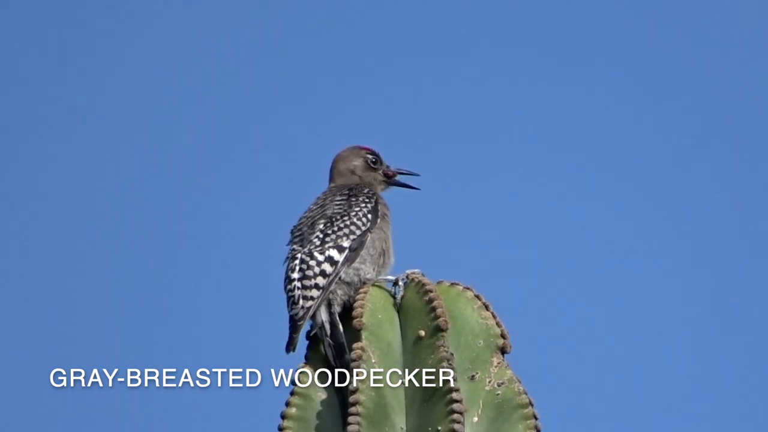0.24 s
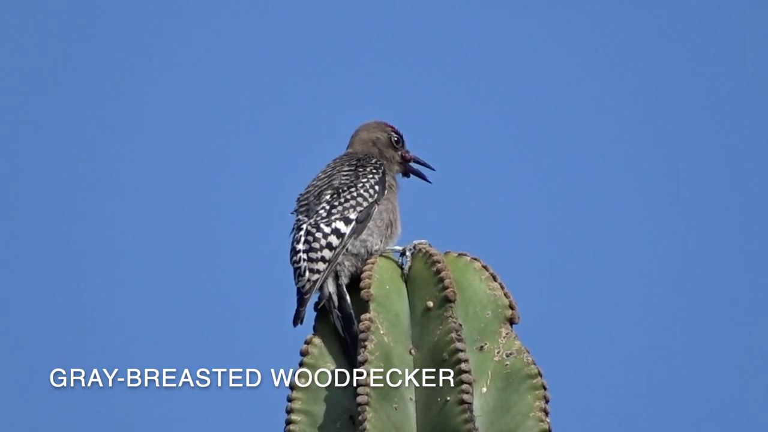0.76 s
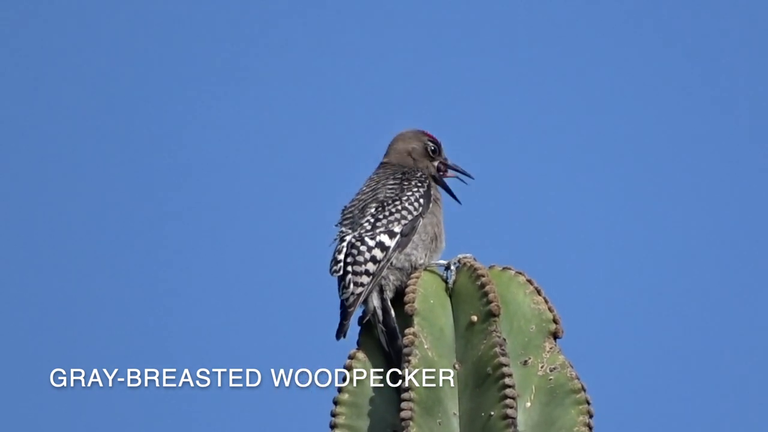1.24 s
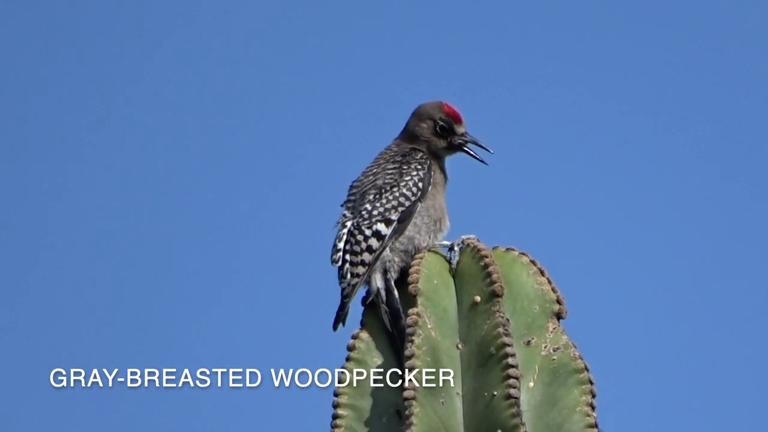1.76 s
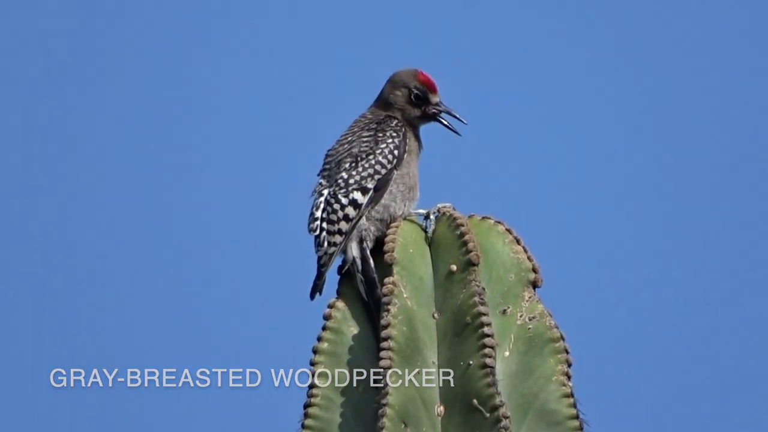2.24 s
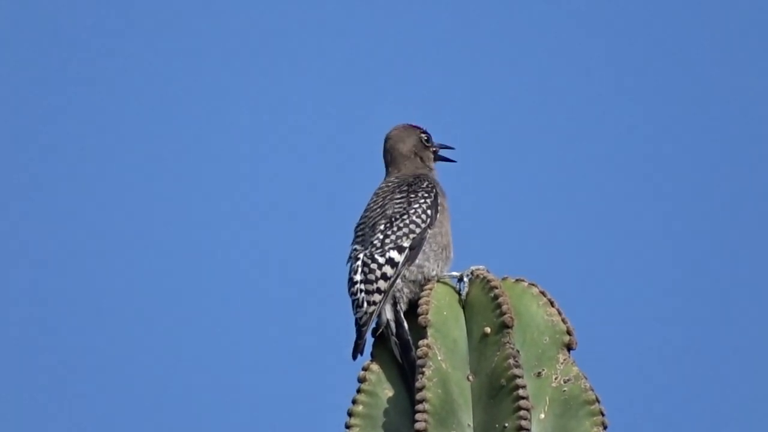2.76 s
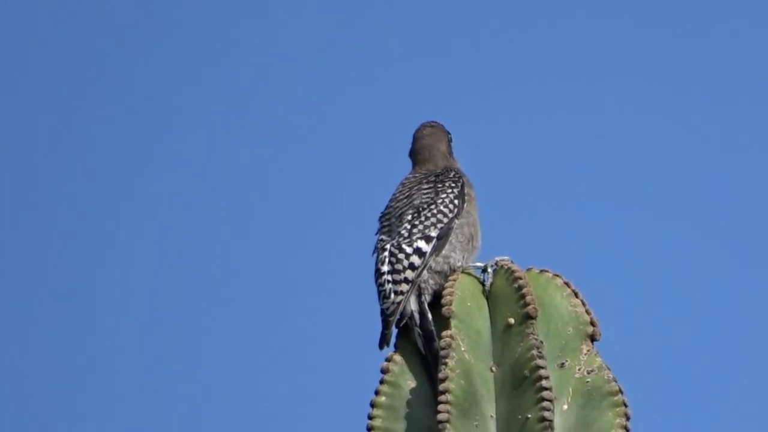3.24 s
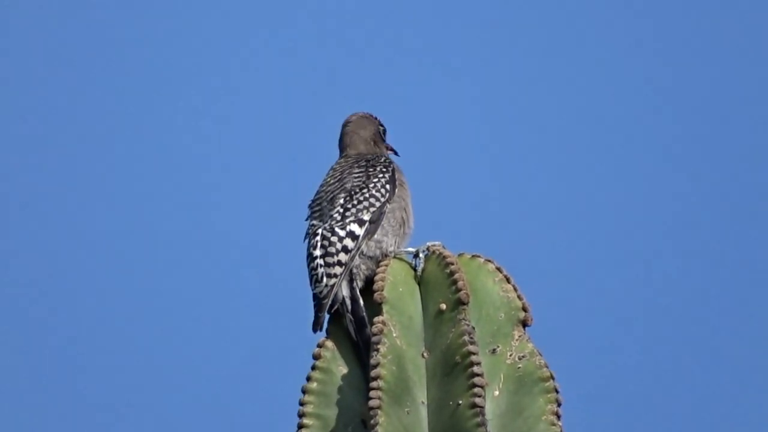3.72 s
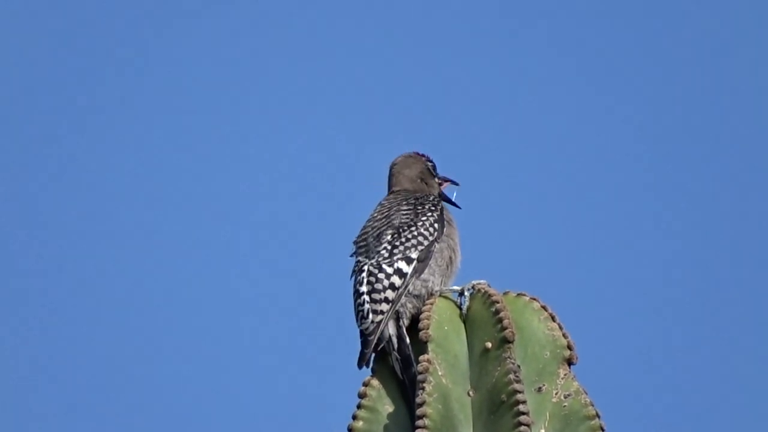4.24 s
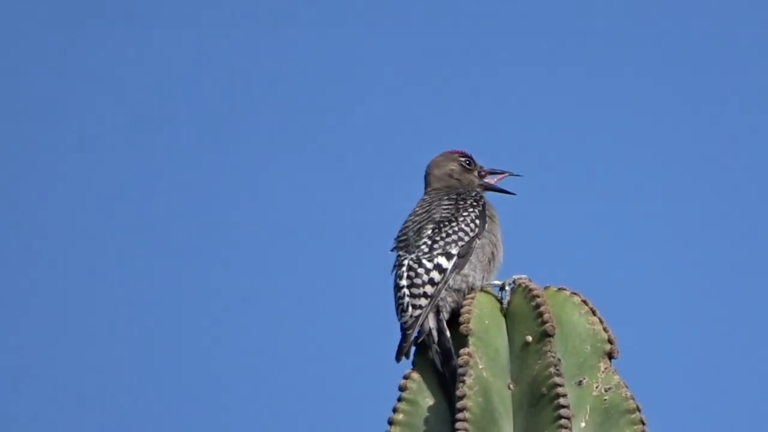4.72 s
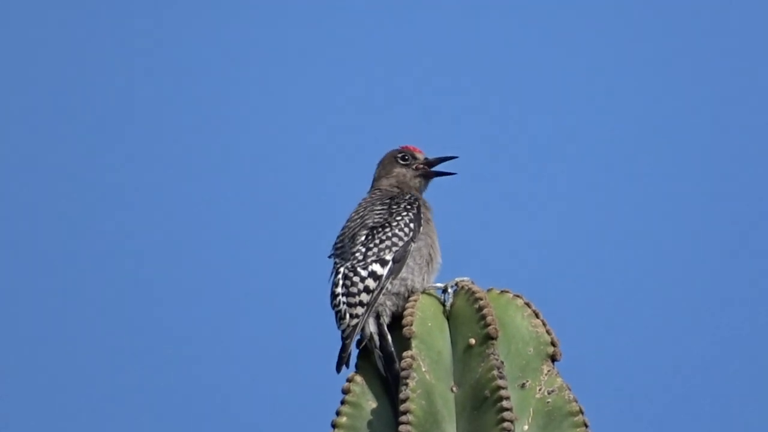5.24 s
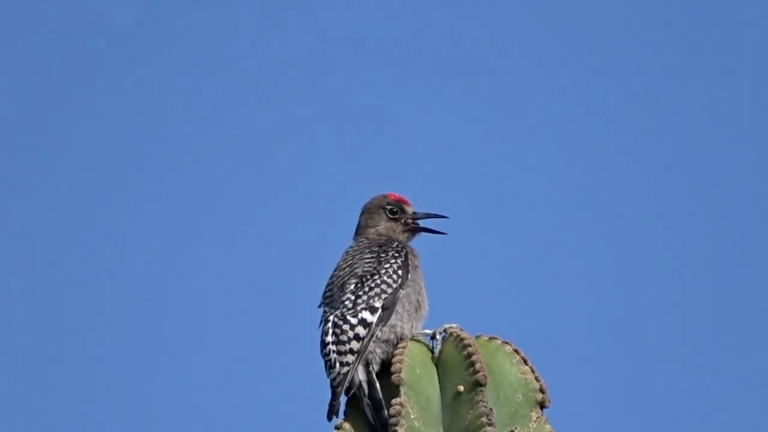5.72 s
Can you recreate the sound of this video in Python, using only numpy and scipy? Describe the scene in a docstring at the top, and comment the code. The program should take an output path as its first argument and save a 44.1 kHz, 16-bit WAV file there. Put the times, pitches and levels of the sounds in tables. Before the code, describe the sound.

A woodpecker gives short, sharp call notes in two runs, each note followed by a softer, lower one, over faint outdoor hiss.

```python
"""Woodpecker on a cactus

Seven sharp notes come in two runs, each trailed by a soft note about an octave lower. Every note is
a short arch of pitch whose overtones pass the throat; ground, scrub and a far slope throw it back.
Behind it lies a bed of low far rush and faint hum, with thin insects, small birds and a dry knock."""
import sys
import numpy as np
from scipy import signal
from scipy.fft import rfft, irfft
from scipy.io import wavfile
from scipy.ndimage import map_coordinates

SR = 44100
rng = np.random.default_rng(int(sys.argv[2]) if len(sys.argv) > 2 else 0)


def pcm_store(signal):
    """Save signal as 16-bit PCM."""
    levels = np.round(np.clip(np.atleast_2d(signal), -1, 1) * 32767)
    wavfile.write(sys.argv[1], SR, levels.astype(np.int16).T)


N = 263718
TIME = np.arange(N) / SR
TOP_HZ = 15800

# colour of the air bed, what both sides share and what differs: f/Hz, relative level/dB
AIR_MID = [(15, -49), (25, -19), (241, -4), (391, -4.5), (435, -1.5), (570, -5.5), (809, -2.5), (1000, -9),
           (1350, -11.5), (1630, -13), (3380, -21.5), (6450, -31.5), (7580, -23.5), (8670, -31),
           (15700, -23.5)]
AIR_SIDE = [(15, -56), (25, -26), (54, -25), (191, -9.5), (604, -1.5), (2630, -11), (4870, -23.5),
            (7480, -29.5), (8320, -32.5), (13800, -28), (15000, -48)]
# fader ride on the hum's third harmonic: t/s, level/dB
WHINE_RIDE = [(0, -73.5), (1.5, -77), (1.9, -70.5), (3, -72), (4.2, -67.5), (5.98, -72)]
# thin insect bands: f/Hz, width/Hz, level/dB, flicker/dB
INSECT_BANDS = [(4360, 310, -81, 2.5), (7590, 830, -81.5, 2.5)]
# colour of the scrub's echo: f/Hz, gain/dB
SCRUB_COLOUR = [(800, -0.5), (1750, 0.5), (3400, -0.5), (5200, 4), (7200, 7), (8600, 14), (13000, 13)]
# chips of distant small birds: t/s, length/s, start f/Hz, middle f/Hz, end f/Hz, level/dB
BIRD_CHIPS = [(0, .025, 3400, 3290, 3280, -72), (0.183, 0.038, 3420, 3350, 3330, -75),
              (0.37, 0.092, 3460, 3400, 3350, -77), (0.955, 0.089, 4800, 5130, 5020, -75),
              (1.006, 0.025, 6600, 6500, 5370, -71), (1.136, 0.021, 6900, 6600, 6550, -78),
              (1.233, .016, 5300, 5900, 6530, -73), (1.247, 0.051, 5000, 5270, 5250, -72.5),
              (1.306, 0.023, 6900, 6700, 5450, -68)]
# one dry knock and two faint ticks: t/s, level/dB, brightness/(dB per octave)
KNOCK_HITS = [(0.697, -37, 1), (3.208, -49, 3.5), (3.633, -54, 2)]
# modes of the knocked object: f/Hz, relative level/dB, t60/s
KNOCK_MODES = [(610, -2, 0.048), (940, -4, 0.014), (1230, -7, .018), (1390, -6, 0.033), (1880, -2, 0.017),
               (2330, -5, 0.013), (3990, -12, 0.012), (4930, -12, 0.0072), (5960, -17, .006),
               (7700, -21, .01)]
# throat and open bill, for sharp and for soft notes: f/Hz, gain/dB
SHARP_THROAT = [(700, -17), (1200, -13.5), (1750, -7.5), (2400, 1.5), (3150, 2.5), (3550, 1.5), (4300, 0.5),
                (5300, -6.5), (7150, -10), (7900, -18), (9000, -39), (10400, -47.5), (12000, -28.5),
                (13500, -37.5), (15000, -52)]
SOFT_THROAT = [(500, -9), (850, -2), (1700, -2.5), (2550, 1), (3400, -7.5), (4250, 1.5), (5400, -7.5),
               (7000, -12), (8500, -31.5), (14000, -58)]
# sharp calls: t/s, length/s, top f/Hz, level/dB, roughness/0-1, brightness/(dB per octave), slope send/dB
SHARP_NOTES = [(1.486, .061, 1733, -37.3, .62, 1.5, -37), (1.96, 0.055, 1737, -33, 0.17, 0, -39),
               (2.416, 0.05, 1811, -30, 0.15, 2.5, -26), (4.215, 0.049, 1802, -31.5, 0.14, 2, -44),
               (4.671, .047, 1780, -31.5, 0.12, 0.5, -35), (5.102, 0.053, 1665, -35.5, .45, -1.5, -30.5),
               (5.515, 0.056, 1758, -32, 0.15, 0.5, -30.5)]
# soft after-notes: t/s, top f/Hz, level/dB, roughness/0-1
SOFT_NOTES = [(1.647, 832, -47, 0.16), (2.114, 887, -45.5, 0.39), (2.564, 839, -46, 0.28),
              (4.372, 901, -47.5, 0.42), (4.822, 928, -45, 0.42), (5.249, 850, -47.5, .35),
              (5.654, 909, -43.5, 0.27)]
# attack and release: pitch dips by the share scoop at the catch and sinks by the share drop at the end
SHARP_ARCH = dict(catch_s=.0128, snap_s=.001205, lead_db=-19.5, scoop=.1494,
                  drop=.47, drop_power=4.3, release_db=-19, release_power=3.23)
SOFT_ARCH = dict(catch_s=.0136, snap_s=.0028, lead_db=-19.5, scoop=.02,
                 drop=.33, drop_power=2.8, release_db=-10.5, release_power=1.35)


def undb(db):
    """Decibels to gain."""
    return 10 ** (np.asarray(db) / 20)


def level(x, db):
    """Scale to an rms level."""
    return x * undb(db) / np.sqrt(np.mean(x ** 2))


def eq_gain(curve, hz):
    """Gain of an EQ curve (f/Hz, gain/dB) at the given frequencies."""
    f, db = np.transpose(curve)
    return undb(np.interp(np.log(np.maximum(hz, 1)), np.log(f), db))


def noise(curve, size):
    """White noise through an EQ curve."""
    return irfft(rfft(rng.standard_normal(size)) * eq_gain(curve, np.fft.rfftfreq(size, 1 / SR)), size)


def wander(rate, size):
    """Smooth random modulator with a spread near 1, moving about rate times a second."""
    steps = np.arange(size) * rate / SR
    return map_coordinates(rng.standard_normal(size // 4 + 4), [steps + 1], order=2, mode="wrap")


def pan(x, pan_db):
    """Mono to stereo, the left louder by pan_db."""
    return x * undb(np.array([[pan_db], [-pan_db]]) / 2)


def add(out, at_s, x):
    """Drop a stereo sound into the mix."""
    start = int(at_s * SR)
    out[:, start:start + x.shape[1]] += x[:, :N - start]


def air(mid_db=-57, side_db=-63.5, swell_db=0.38, flutter_db=0.96):
    """A soft far rush swells and flutters a little under a steady fine hiss."""
    mid, side = level(noise(AIR_MID, N), mid_db), level(noise(AIR_SIDE, N), side_db)
    bed = mid + side * np.array([[1], [-1]])
    rush = signal.sosfilt(signal.butter(1, 2500, fs=SR, output="sos"), bed)
    swell = undb(swell_db * wander(2.065, N) + flutter_db * wander(18, N))
    return bed + rush * (swell - 1)


def machine_hum(hz=436.2, drone_db=-72, waver=0.0011, flicker_db=2.5):
    """A far machine: a wavering drone with a whine on its third harmonic."""
    phase = 2 * np.pi * np.cumsum(hz * (1 + waver * wander(9, N))) / SR
    whine = level(np.sin(3 * phase) * undb(flicker_db * wander(7, N)), 0)
    drone = np.sin(phase + wander(25, N)) * undb(flicker_db * wander(14, N))
    return whine * undb(np.interp(TIME, *np.transpose(WHINE_RIDE))) + level(drone, drone_db)


def insects(flicker_rate=21.96):
    """Narrow, flickering bands of distant stridulation."""
    out = 0
    for hz, width, db, flicker_db in INSECT_BANDS:
        bell = [(hz - 2 * width, -60), (hz - width / 2, -3), (hz, 0),
                (hz + width / 2, -3), (hz + 2 * width, -60)]
        out += level(noise(bell, N) * undb(flicker_db * wander(flicker_rate, N)), db)
    return out


def slope_echo(delay_s=.313, t60=0.67, dull_hz=4200):
    """Impulse response of a far slope: it answers late, and the long air path takes off the treble."""
    t = np.arange(SR // 2) / SR - delay_s
    fade = (t > 0) * undb(-60 * np.abs(t) / t60)
    echo = rng.standard_normal(len(t)) * fade / np.sqrt(np.sum(fade ** 2))
    return pan(signal.sosfilt(signal.butter(4, dull_hz, fs=SR, output="sos"), echo), 0)


def scrub_echo(predelay_s=0.0065, near_t60=0.12, far_t60=0.51, far_db=-4, width=0.18, pan_db=1.5):
    """Impulse response of open country: quick scatter off ground and plants, then a thin long tail."""
    t = np.arange(SR // 2) / SR
    onset = np.clip(t / predelay_s - 1, 0, 1)
    fade = onset * (undb(-60 * t / near_t60) + undb(far_db - 60 * t / far_t60))
    mid, side = (noise(SCRUB_COLOUR, len(t)) * fade / np.sqrt(np.sum(fade ** 2)) for _ in range(2))
    return pan(mid, pan_db) + width * side * np.array([[1], [-1]])


def small_birds(scrub_db=-3, quaver=.014, quaver_rate=300):
    """Bent, quavering whistles from far off, blurred by the scrub."""
    out = np.zeros((2, N))
    for at_s, length_s, start_hz, middle_hz, end_hz, db in BIRD_CHIPS:
        along = np.linspace(0, 1, int(length_s * SR))
        bend = np.polyfit([0, .5, 1], [start_hz, middle_hz, end_hz], 2)
        hz = np.polyval(bend, along) * (1 + quaver * wander(quaver_rate, len(along)))
        chip = level(np.sin(2 * np.pi * np.cumsum(hz) / SR) * np.sin(np.pi * along), db)
        add(out, at_s, pan(chip, 0))
        add(out, at_s, undb(scrub_db) * signal.fftconvolve(chip[None], scrub_echo(), axes=1))
    return out


def knocks(attack_s=0.0007, pan_db=-4):
    """Light blows ring a few damped modes, close by on the right."""
    out, t = np.zeros((2, N)), np.arange(SR // 10) / SR
    for at_s, hit_db, bright_db in KNOCK_HITS:
        ring = 0
        for hz, db, t60 in KNOCK_MODES:
            decay = undb(db + bright_db * np.log2(hz / 2000) - 60 * t / t60)
            ring += decay * np.sin(2 * np.pi * (hz * t + rng.random()))
        add(out, at_s, pan(undb(hit_db) * ring * np.minimum(t / attack_s, 1), pan_db))
    return out


def outdoors(voice, pan_db, scrub_db, slope_db, pan_db_per_octave=2):
    """The direct note, its low overtones furthest left, plus returns from the scrub and the far slope."""
    echoes = undb(scrub_db) * scrub_echo() + undb(slope_db) * slope_echo()
    out = signal.fftconvolve(voice[None], echoes, axes=1)
    hz = np.clip(np.fft.rfftfreq(len(voice), 1 / SR), 1500, 7000)
    left_db = pan_db - pan_db_per_octave * np.log2(hz / 3500)
    out[:, :len(voice)] += irfft(rfft(voice) * undb(np.array([left_db, -left_db]) / 2), len(voice))
    return out


def arch(size, rough, catch_s, snap_s, lead_db, scoop, drop, drop_power, release_db, release_power):
    """Pitch and effort envelopes: the voice catches, holds and falls away as the effort runs out."""
    t = np.arange(size) / SR
    caught = .5 + .5 * np.tanh((t - catch_s) / (2 * snap_s * (1 + rough)))
    spent = np.clip((t - catch_s) / (t[-1] - catch_s), 0, 1)
    strain = caught * (1 - caught) ** 2
    sag = spent ** (drop_power / (1 + 1.5 * rough ** 2))  # hoarse notes sag sooner
    pitch_ratio = (1 - scoop * strain / strain.max()) * (1 - drop * sag)
    effort_db = 20 * np.log10(caught + undb(lead_db) * (1 - caught)) + release_db * spent ** release_power
    return pitch_ratio, effort_db


def syrinx(length_s, top_hz, rough, bright_db, throat, shape,
           jitter=0.05, shimmer_db=3, rasp_db=-6, rasp_rate=900, slack=0.81, mellow=0.079, fray=.85):
    """One note through the throat; when it runs rough, pitch and strength stumble from cycle to cycle."""
    size = int(length_s * SR)
    along = np.linspace(0, 1, size)
    pitch_ratio, effort_db = arch(size, rough, **shape)
    # the membranes beat unevenly while the pressure builds, and fray again as it runs out
    weakness = 1 - np.minimum(undb(effort_db), 1)
    rough = rough + weakness * (slack * (1 - along) ** 2 + fray * along ** 2)
    hz = top_hz * pitch_ratio * (1 + jitter * rough * wander(rasp_rate, size))
    phase = 2 * np.pi * np.cumsum(hz) / SR
    tone = 0
    for k in range(1, 14):
        # harmonics above the second fade first when the effort drops
        tilt_db = bright_db * np.log2(k * hz / 3500) + mellow * effort_db * np.log2(max(k / 2, 1))
        gain = eq_gain(throat, k * hz) * undb(tilt_db) * (k * hz < TOP_HZ)
        tone += gain * np.sin(k * phase + 2 * np.pi * rng.random())
    # air escapes in a puff once a cycle
    rasp = level(noise(throat, size), rasp_db) * rough * (1 + np.cos(phase))
    envelope = undb(effort_db + shimmer_db * rough * wander(rasp_rate, size))
    return (level(tone, 0) + rasp) * envelope * signal.windows.tukey(size, .16)


def woodpecker(soft_length_s=.053, soft_bright_db=0.74):
    """Sharp notes and soft after-notes; the head turns, so the far slope answers some more than others."""
    out = np.zeros((2, N))
    for at_s, length_s, top_hz, db, rough, bright_db, slope_db in SHARP_NOTES:
        voice = undb(db) * syrinx(length_s, top_hz, rough, bright_db, SHARP_THROAT, SHARP_ARCH)
        add(out, at_s, outdoors(voice, pan_db=5.5, scrub_db=-5.5, slope_db=slope_db))
    for at_s, top_hz, db, rough in SOFT_NOTES:
        voice = undb(db) * syrinx(soft_length_s, top_hz, rough, soft_bright_db, SOFT_THROAT, SOFT_ARCH)
        add(out, at_s, outdoors(voice, pan_db=6, scrub_db=-6, slope_db=-36))
    return out


def scene():
    """The mix: the woodpecker up front, a little to the left of everything else."""
    return woodpecker() + small_birds() + knocks() + air() + insects() + machine_hum()


def record(dry):
    """A steep high cut on the whole mix."""
    return signal.sosfilt(signal.ellip(10, .1, 70, TOP_HZ, fs=SR, output="sos"), dry)


dry = scene()
out = record(dry)
pcm_store(out)
```